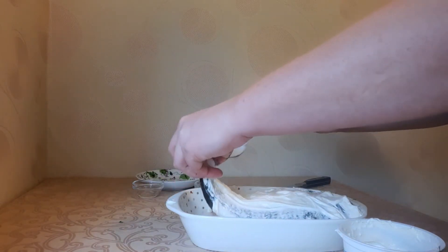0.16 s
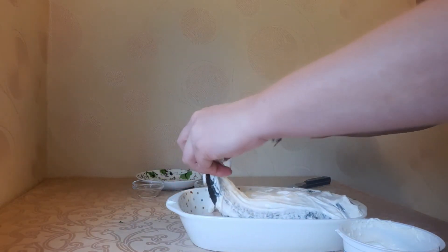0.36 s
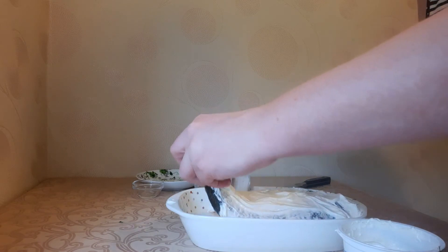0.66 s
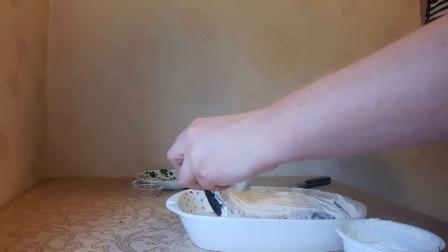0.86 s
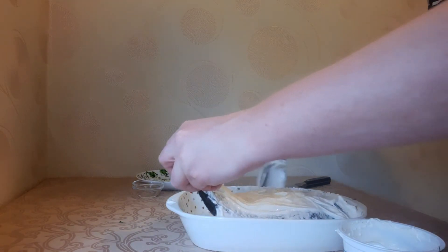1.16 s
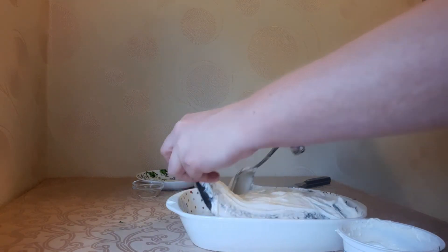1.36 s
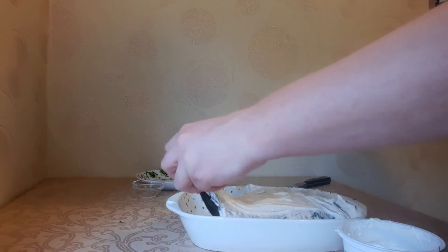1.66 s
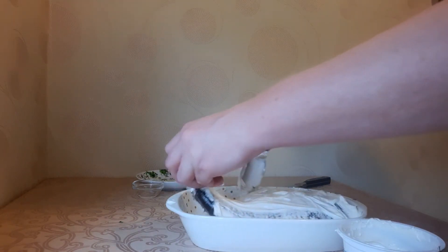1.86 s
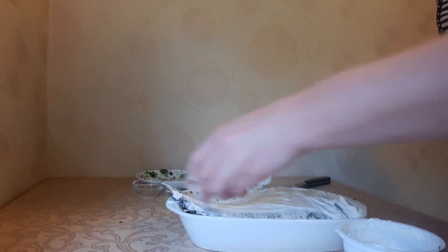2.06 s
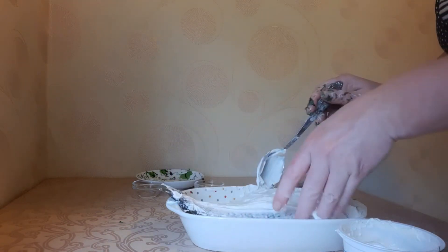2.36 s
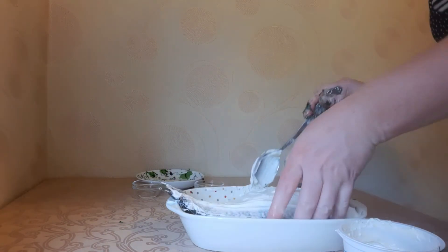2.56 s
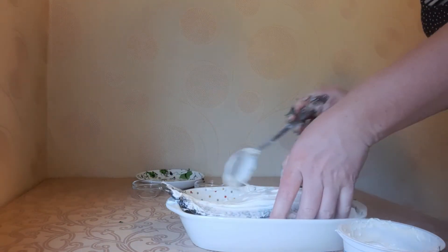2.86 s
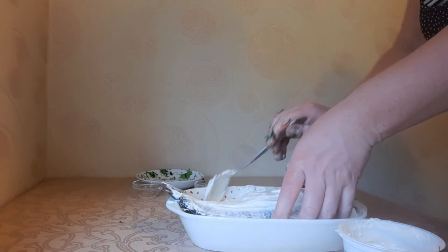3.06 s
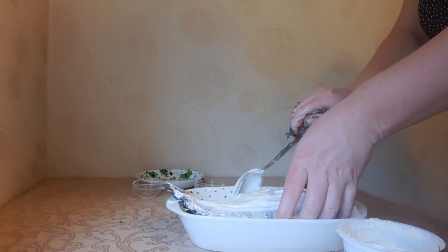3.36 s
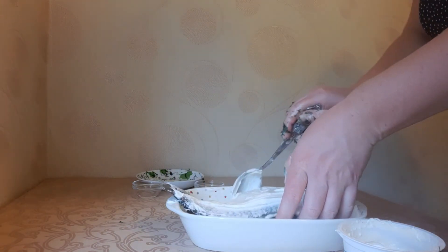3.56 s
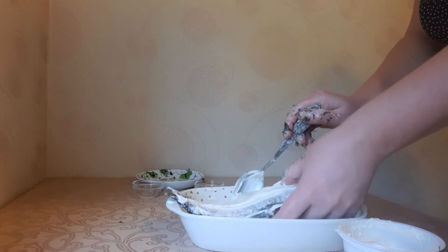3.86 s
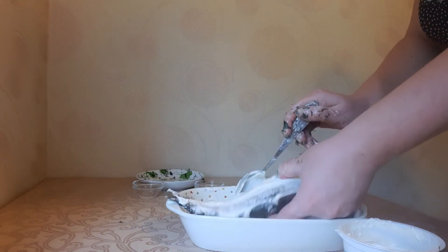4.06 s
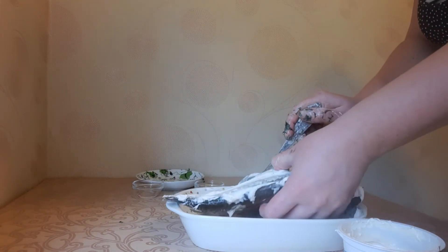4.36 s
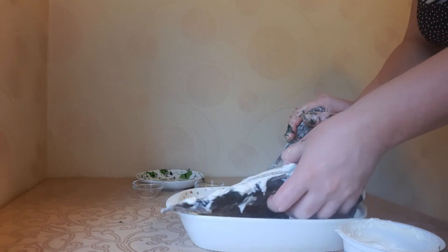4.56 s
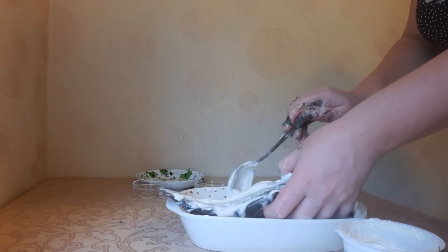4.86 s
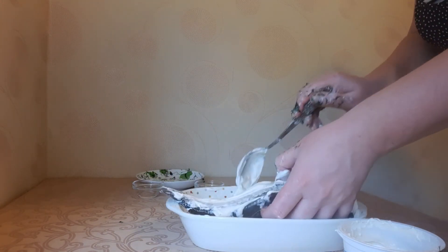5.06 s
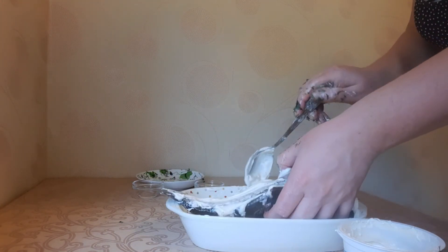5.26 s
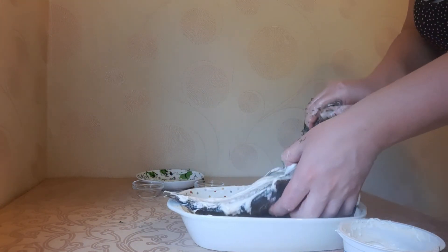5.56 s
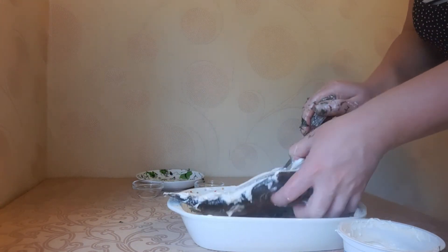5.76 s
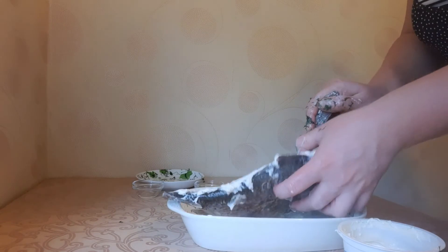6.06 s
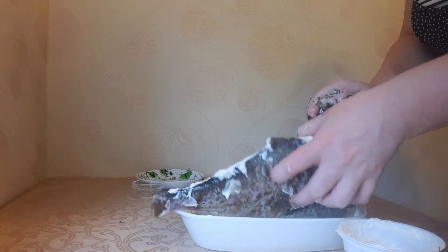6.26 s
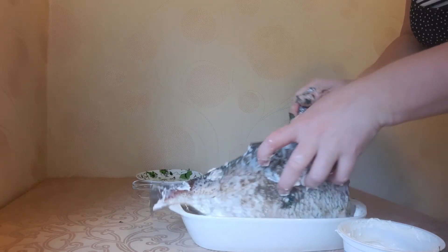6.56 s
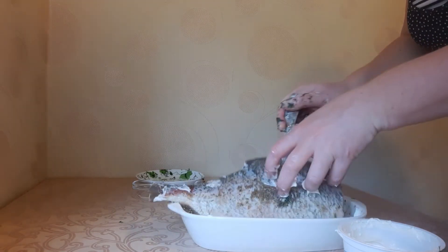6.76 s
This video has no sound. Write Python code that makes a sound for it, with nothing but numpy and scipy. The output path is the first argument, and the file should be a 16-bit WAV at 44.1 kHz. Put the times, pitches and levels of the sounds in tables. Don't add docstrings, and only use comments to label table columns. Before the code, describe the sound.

A spoon knocks in short, damped clacks on a sauce-coated ceramic dish in a small kitchen, then drops loudly and scrapes, over faint refrigerator hum.

```python
import sys
import numpy as np
from scipy import signal
from scipy.fft import rfft, irfft, next_fast_len
from scipy.io import wavfile
from scipy.ndimage import uniform_filter1d, map_coordinates

SR = 44100
rng = np.random.default_rng(int(sys.argv[2]) if len(sys.argv) > 2 else 0)


def to_linear_factor(level_db):
    exponent = np.asarray(level_db, float) / 20
    return 10 ** exponent


def waveform_to_disk(signal):
    frames = np.transpose(np.atleast_2d(signal))
    scaled = np.clip(frames, -1, 1) * 32767
    samples = np.round(scaled).astype(np.int16)
    wavfile.write(sys.argv[1], SR, samples)


N = 304731
SPAN = 20480

# pitch_hz, level_db (rms)
FRIDGE_HUM = [(96.9, -78.5), (145.3, -70), (199.2, -74), (247.6, -74), (296.1, -77), (344.5, -94),
              (398.4, -73.5), (543.7, -78), (640.6, -86), (829.0, -82.5)]
# pitch_hz, width_hz, level_db (rms)
FRIDGE_WHINE = [(2791, 57, -77.5), (2400, 26, -89)]
# freq_hz, level_db (per Hz)
RUMBLE_COLOUR = [(15, -34.5), (25, -16.5), (58, 8), (136, -2), (248, -8.5), (343, -31), (399, -2.5),
                 (500, -11.5), (650, -33), (1100, -120)]
AIR_COLOUR = [(150, -26.5), (250, 0.5), (345, 2.5), (400, -4), (468, -4.5), (875, -2), (1390, -14.5),
              (2000, -20), (2600, -30), (4400, -120)]
HISS_COLOUR = [(710, -42), (1200, -12.5), (1400, -21.5), (2350, -12), (2530, -13.5), (2790, -7),
               (2890, -12), (3110, -17.5), (5180, -23), (8630, -17.5), (10400, -23), (15200, -20),
               (16000, -20)]
# middle_s (of the swell), length_s, swell_db
WEIGHT_SHIFTS = [(0.023, 0.49, 4.5), (2.24, 0.14, 5), (2.597, 0.48, 3.5), (3.19, 0.43, 11),
                 (3.738, 0.2, 17.5), (4.06, 0.62, 9), (4.626, 0.68, 6.5), (5.533, .3, 24),
                 (5.834, 0.77, 3.5), (6.304, 0.63, 16.5), (6.662, 0.19, 3.5)]
# freq_hz, likeness (1 same, 0 unrelated)
STEREO_LIKENESS = [(60, 0.97), (180, 0.87), (550, 0.45), (1650, -0.22), (4970, -0.004), (15000, -0.15)]
# freq_hz, left_minus_right_db
BACKGROUND_LEAN = [(60, 4), (130, 2), (290, 6.5), (640, -0.5), (1410, 0.5), (3100, 4), (6820, 0.5),
                   (15000, 0)]
# freq_hz, left_minus_right_db
MIC_DIFFERENCE = [(100, -2), (400, 3), (2000, 0.5), (4500, 1.5), (10000, -1.5)]
# freq_hz, decay_s (to fall 60 dB)
KITCHEN_DECAY = [(70, 0.15), (250, 0.56), (1000, 0.38), (3000, 0.38), (7000, 0.36), (14000, 0.27)]

# pitch_hz, width_hz, level_db
TABLE_MODES = [(67.4, 27, 2), (136.5, 39, 1.5), (313, 110, -6.5)]
# start_s, peak_db
PUSHES = [
    (1.432, -40),
    (2.021, -46.5),
    (2.186, -40),
    (3.71, -32.5),
    (6.149, -42),
]
# start_s, peak_db, pitch_hz, spread (0 narrow to 1 wide)
SAUCE_SMACKS = [(0.1334, -68, 8600, 0.7), (0.2694, -69, 7640, 0.5), (0.6669, -60, 8700, 0.9),
                (0.8494, -70, 8670, 0.6), (1.7015, -57, 12500, 1), (1.886, -62, 7850, 0.6),
                (2.1904, -63.5, 8350, 0.65), (2.4608, -64, 7600, 0.5), (3.981, -66, 4680, 0.8),
                (4.385, -59.5, 4600, 0.37), (4.968, -63.5, 9460, 0.24), (5.784, -57.5, 5370, 0.44),
                (6.845, -60, 7500, 0.4),
                (4.0092, -62.5, 9160, 0.69),
    (5.7847, -52.5, 9800, 0.48),
    (6.3999, -54.5, 8200, 0.65),
    (6.4436, -56, 9450, 0.74),
]

# start_s, rise_s, hold_s, pressure_db
SLIDES = [
    (4.372, 0.085, 0.12, -62),
]
GLIDES = [
    (4.597, 0.054, 0.18, -71.5),
]
DRAGS = [
    (5.98, 0.12, 0.019, -47.5),
    (6.086, 0.034, 0.058, -25.5),
    (6.2, 0.019, 0.025, -29.5),
]
LIFTS = [
    (6.32, 0.056, 0.016, -45.5),
    (6.385, 0.018, 0.0098, -39),
]
# start_s, peak_db
SNAGS = [(6.098, -33), (6.107, -35), (6.115, -29), (6.127, -21), (6.136, -32), (6.155, -27), (6.175, -29),
         (6.197, -29), (6.225, -26.5), (6.235, -31), (6.249, -36), (6.361, -52)]
# freq_hz, level_db (per Hz)
GLAZE_GRIT = [(120, -57), (200, -10), (728, -22.5), (923, 3), (1030, -10.5), (1650, -2), (2170, -15.5),
              (3120, -19.5), (15500, -63.5)]
# pitch_hz, width_hz, level_db
SPOON_MODES = [(3084, 32, 3.5), (5820, 87, -23), (7790, 28, -17.5), (11300, 220, -25.5)]

# start_s, peak_db, thud_db (of the table)
TAPS = [
    (1.028, -22.5, -33),
    (1.06, -26.5, -18),
]
SIDE_KNOCKS = [
    (1.298, -23, -17.5),
]
RIM_KNOCKS = [
    (3.0574, -11.5, -28.5),
]
LIP_KNOCKS = [
    (3.499, -21, -24),
]
NUDGES = [
    (4.173, -39, -13),
    (5.838, -44.5, -40),
    (5.956, -39.5, -6.5),
]
PATS = [
    (4.942, -46, -19),
]
EDGE_KNOCKS = [
    (5.27, -20, -23.5),
]
CLINKS = [
    (5.386, -20, -26.5),
    (5.435, -37.5, -31.5),
]
DROPS = [
    (5.5335, -22, -13.5),
    (5.5362, -6.5, -15),
]
BASE_KNOCKS = [
    (6.09, -26.5, -35),
]
LIFT_KNOCKS = [
    (6.401, -28.5, -17),
    (6.432, -35.5, -12),
    (6.452, -39.5, -25),
]
LAST_KNOCKS = [
    (6.9003, -18.5, -31),
]

# pitch_hz, width_hz, level_db
TAP_MODES = [(431, 7.2, -3), (921, 70, -6.5), (1435, 105, 1.5), (2016, 20, -1.5), (2277, 6.2, 1),
             (2680, 26, -15), (2830, 30, -12.5), (3680, 46, -14.5), (4300, 90, -21)]
SIDE_MODES = [(956, 90, 2.5), (1410, 65, 10.5), (1630, 82, 7.5), (2290, 34, 7), (2650, 110, 3),
              (3620, 70, -0.5), (4400, 76, -3.5), (5870, 150, -9.5), (7050, 65, -18)]
RIM_MODES = [(579, 5.8, -11), (805, 24, 1.5), (1356, 210, -2), (1502, 73, 2), (1680, 51, 3.5),
             (2010, 32, 3), (2890, 200, -13), (3094, 60.5, -12), (5530, 108, -10)]
LIP_MODES = [(308, 114, -22), (634, 22, 8), (1490, 87, 3), (1960, 27, 19), (2900, 100, -4.5),
             (5200, 80, -44), (3320, 72, -11), (6880, 57, -29)]
NUDGE_MODES = [(918, 160, -2), (1566, 82, 0.5), (2035, 12, -2.5), (2680, 66, -27), (3160, 70, -8.5),
               (3820, 70, -45)]
PAT_MODES = [(993, 180, 2.5), (1290, 70, 1), (2050, 67, -11)]
EDGE_MODES = [(465, 28.6, -0.5), (1020, 47, 13.5), (1548, 173, 6), (2570, 170, -1.5), (3740, 86, 3),
              (4810, 39, -43.5), (5900, 15.95, -0.5)]
CLINK_MODES = [(1022, 99, -12), (1432, 63, -13), (2538, 44, -3.5), (3500, 24, -36.5), (5500, 220, -54.5)]
DROP_MODES = [(300, 69, -5.5), (442, 60, -7.5), (1021, 28, -3), (1794, 19, 2.5), (2490, 20, 4),
              (2900, 47, -12), (3380, 85, -4), (4210, 60, -18), (4900, 27, -10), (5540, 29, -11),
              (6960, 52, -10.5)]
BASE_MODES = [(424, 47, -11.5), (963, 7.1, -0.5), (1118, 9.1, 2.5), (1372, 10, 6), (1627, 31, 6.5),
              (1960, 49, -18), (2040, 6.7, -1.5), (2496, 31, -3), (3120, 34, -15.5), (4170, 120, -21.5),
              (6100, 60, -43), (8040, 90, -36)]
LIFT_MODES = [(324, 160, 4), (1190, 33, 7), (1540, 25, 11), (1595, 15, 9), (1960, 71, -5), (2450, 72, -1),
              (3040, 150, -7.5), (4230, 350, -12.5), (5650, 44, -13)]
LAST_MODES = [(1100, 150, 0.5), (1450, 127, 10.5), (1780, 185, 6), (2580, 80, -7), (3650, 250, -10)]
SLIDE_MODES = [(1170, 120, 4), (1570, 75, 0), (2070, 47, -8), (2360, 37, 3.5), (2980, 220, -10.5)]

# freq_hz, level_db (per Hz)
TAP_CLATTER = [(120, -31), (200, -10), (352, 4), (392, -39), (446, -3), (1170, 0.5), (1380, 10.5),
               (1840, 0.5), (2290, -4.5), (2900, -6.5), (5000, -20), (15500, -35)]
SIDE_CLATTER = [(120, -51), (200, -9), (497, 0), (690, -5.5), (1380, 7), (1810, -6), (2210, 0), (3120, -15),
                (3550, -31), (6830, -16), (15500, -30)]
RIM_CLATTER = [(120, -36), (200, -21), (315, -8), (525, -11), (618, -10.5), (950, -8), (1450, -14.5),
               (1780, -5.5), (3000, -13), (3600, -20), (5590, -25), (6350, -33), (15500, -36)]
LIP_CLATTER = [(120, -8), (200, -14), (310, -6.5), (525, -18.5), (618, -7.5), (798, -8.5), (1300, -10),
               (1840, -2.5), (2330, -9.5), (3500, -13), (4100, -24.5), (7000, -29.5), (15500, -40)]
EDGE_CLATTER = [(120, -11.5), (200, -13.5), (446, 4), (600, -22.5), (1090, -8.5), (1910, -1), (2130, -23.5),
                (2330, 4.5), (3120, -21.5), (4330, -2), (5110, -34.5), (7220, -11.5), (15500, -23.5)]
DROP_CLATTER = [(120, -45.5), (200, -11), (310, -3.5), (525, -17.5), (874, -8.5), (1280, -15.5),
                (2510, -17.5), (2800, -10.5), (3300, -16), (4400, -27.5), (6240, -29.5), (15500, -38)]
BASE_CLATTER = [(120, -45), (200, -22), (407, -6), (728, -23), (923, 3), (1030, -12), (1650, -5),
                (2170, -23), (2470, 0), (2800, -21.5), (3120, -16), (3680, -21), (6710, -36.5),
                (7760, -24.5), (15500, -56.5)]


def unit(x):
    return x / np.sqrt(np.mean(x ** 2) + 1e-20)


def along(points, hz):
    f, value = np.transpose(points)
    return np.interp(np.log(hz + 1), np.log(f + 1), value)


def wobble(rate, size=N):
    coarse = np.arange(0, size + 64, 64)
    knots = rng.standard_normal(int(size * rate / SR) + 4)
    curve = map_coordinates(knots, [coarse * rate / SR])
    return np.interp(np.arange(size), coarse, curve)


def filtered(x, response):
    n = x.shape[-1]
    padded = 2 * next_fast_len(n // 2 + 2048)
    hz = np.fft.rfftfreq(padded, 1 / SR)
    return irfft(rfft(x, padded) * response(hz), padded)[..., :n]


def body(modes, damping):
    def response(f):
        total = 0
        for k, (pitch_hz, width_hz, level_db) in enumerate(modes):
            loss = 1j * f * (width_hz * damping + pitch_hz / 55)
            sign = (-1) ** k
            total = total + sign * to_linear_factor(level_db) * loss / (pitch_hz ** 2 - f ** 2 + loss)
        return total
    return response


def causal(spectrum):
    def response(hz):
        cepstrum = irfft(np.log(to_linear_factor(along(spectrum, hz)) + 1e-4))
        cepstrum[1:len(hz) - 1] *= 2
        cepstrum[len(hz):] = 0
        return np.exp(rfft(cepstrum))
    return response


def diffuse(pair):
    def mid_and_side(hz):
        angle = np.arccos(np.clip(along(STEREO_LIKENESS, hz), -1, 1)) / 2
        return np.array([np.cos(angle), np.sin(angle)])
    mid, side = filtered(pair, mid_and_side)
    return np.array([mid + side, mid - side])


def room(x):
    gap_s, rise_s = 0.00065, 0.0014
    hz, t, z = signal.stft(rng.standard_normal((2, SPAN)), SR, nperseg=256)
    decay = to_linear_factor(-60 * t / along(KITCHEN_DECAY, hz)[:, None])
    tail = diffuse(signal.istft(z * decay, SR, nperseg=256)[1][:, :SPAN])
    since_gap_s = np.clip(np.arange(SPAN) / SR - gap_s, 0, None)
    tail = tail * (1 - np.exp(-since_gap_s / rise_s))
    tail = tail / np.linalg.norm(tail[0])
    return signal.fftconvolve(x[None], tail, axes=1)[:, :len(x)]


def add(out, start_s, sound):
    start = round(start_s * SR)
    part = out[:, start:start + SPAN]
    part += sound[:, :part.shape[1]]


def struck(response, chatter_s):
    knots = rng.random(64) ** 2

    def chattering(f):
        lag_s = chatter_s * np.interp(f, np.arange(len(knots)) * 350, knots)
        return response(f) * np.exp(-2j * np.pi * f[1] * np.cumsum(lag_s))
    ring = filtered(signal.unit_impulse(SPAN // 2), chattering)
    return np.pad(ring / np.max(np.abs(ring)), (0, SPAN // 2))


def softened(response, soft_hz):
    return lambda f: response(f) / (1 + 1j * f / soft_hz) ** 2


def rush(spectrum, patchy_db):
    z = signal.stft(rng.standard_normal((2, N)), nperseg=512)[2]
    patches = uniform_filter1d(rng.standard_normal(z.shape[1:]), 6, 0)
    patches = unit(uniform_filter1d(patches, 14, 1))
    pair = signal.istft(z * to_linear_factor(patchy_db * patches), nperseg=512)[1][:, :N]
    return unit(filtered(diffuse(pair), lambda hz: to_linear_factor(along(spectrum, hz))))


def fridge_hum():
    t = np.arange(N) / SR
    hum = np.zeros(N)
    for pitch_hz, level_db in FRIDGE_HUM:
        level = 2 ** .5 * to_linear_factor(level_db + 0.39 * wobble(2.4))
        phase = 0.55 * wobble(7.2) + 2 * np.pi * rng.random()
        hum += level * np.sin(2 * np.pi * pitch_hz * t + phase)
    return hum


def fridge_whine():
    whine = np.zeros((2, N))
    for pitch_hz, width_hz, level_db in FRIDGE_WHINE:
        def band(f):
            return 1 / (1 + (2 * (f - pitch_hz) / width_hz) ** 2)
        whine += to_linear_factor(level_db) * unit(filtered(rng.standard_normal((2, N)), band))
    return whine


def weight_swell():
    t = np.arange(N) / SR
    swell_db = np.zeros(N)
    for middle_s, length_s, rise_db in WEIGHT_SHIFTS:
        swell_db += rise_db * np.cos(np.pi * np.clip((t - middle_s) / length_s, -.5, .5)) ** 2
    return swell_db


def room_boom(swell_db):
    boom_hz = 65
    level = to_linear_factor(-76 + 0.43 * swell_db + 3 * wobble(5.77))
    return level * np.sin(2 * np.pi * boom_hz * np.arange(N) / SR + 1.26 * wobble(4.9))


def background():
    swell_db = weight_swell()
    rumble = to_linear_factor(-65.5 + swell_db + wobble(2.4)) * rush(RUMBLE_COLOUR, patchy_db=2.5)
    air = to_linear_factor(-68 + 0.55 * swell_db + wobble(1.5)) * rush(AIR_COLOUR, patchy_db=2.0)
    hiss = to_linear_factor(-76) * rush(HISS_COLOUR, patchy_db=0.3)
    mix = fridge_hum() + fridge_whine() + room_boom(swell_db) + rumble + air + hiss
    return filtered(mix, lambda hz: to_linear_factor(along(BACKGROUND_LEAN, hz) * np.array([[.5], [-.5]])))


def thuds():
    out = np.zeros((2, N))
    for start_s, peak_db in PUSHES:
        push = struck(softened(body(TABLE_MODES, 1), soft_hz=298), chatter_s=0.0037)
        add(out, start_s, to_linear_factor(peak_db - 3) * (push + 1.3 * room(push)))
    return out


def smacks():
    out = np.zeros((2, N))
    decay = to_linear_factor(-60 * np.arange(SPAN) / SR / 0.043)
    for start_s, peak_db, pitch_hz, spread in SAUCE_SMACKS:
        def band(f):
            return np.exp(-(np.log((f + 1) / pitch_hz) / max(spread, .05)) ** 2 * 4)
        tick = filtered(rng.standard_normal(SPAN) * decay, band)
        level = to_linear_factor(peak_db - 6) / np.max(np.abs(tick))
        add(out, start_s, level * (tick + to_linear_factor(7.5) * room(tick)))
    return out


def pressure(stroke, t):
    sag_db, release_db_per_s = 4.5, 376
    total = 0
    for start_s, rise_s, hold_s, level_db in stroke:
        held_s = t - start_s - rise_s
        bearing = np.clip((t - start_s) / rise_s, 0, 1) ** 2
        sag = sag_db * np.clip(held_s / hold_s, 0, 1)
        release = release_db_per_s * np.clip(held_s - hold_s, 0, None)
        total = total + bearing * to_linear_factor(level_db - sag - release)
    return total


def spoon_stroke(stroke, modes, grit_db, spoon_db, snags=()):
    start_s, slips_per_s = stroke[0][0], 700
    t = np.arange(SPAN) / SR
    happens = rng.random((4, SPAN)) < slips_per_s / SR
    slips = happens * rng.standard_normal((4, SPAN)) * to_linear_factor(1.2 * rng.exponential(1, (4, SPAN)))
    slips = slips * to_linear_factor(1.55 * np.array([wobble(58.0, size=SPAN) for _ in slips]))
    slips[3] *= to_linear_factor(-36 * np.clip(t - .15, 0, None))

    def paths(f):
        dish_a, dish_b = body(modes[::2], 1.3)(f), body(modes[1::2], 1.3)(f)
        grit = to_linear_factor(grit_db) * causal(GLAZE_GRIT)(f)
        spoon = to_linear_factor(spoon_db) * body(SPOON_MODES, 1.1)(f)
        dulling = (1 + 1j * f / 9000) * (1 + (f / 13500) ** 8)
        return np.array([dish_a, dish_b, grit, spoon]) / dulling

    drag = unit(filtered(slips, paths).sum(axis=0)) * to_linear_factor(-4.5) * pressure(stroke, start_s + t)
    for snag_s, peak_db in snags:
        shares = to_linear_factor(3 * rng.standard_normal((4, 1)))
        snag = struck(lambda f: (shares * paths(f)).sum(axis=0), chatter_s=.0012)
        delay = (snag_s - start_s) * SR
        begun = np.arange(SPAN) >= delay - 40
        drag += to_linear_factor(peak_db) * np.roll(snag, round(delay)) * begun
    out = np.zeros((2, N))
    add(out, start_s, drag * to_linear_factor([[1.2], [-1.2]]) + to_linear_factor(1.0) * room(drag))
    return out


def scrape():
    return (spoon_stroke(SLIDES, SLIDE_MODES, grit_db=3, spoon_db=-30)
            + spoon_stroke(GLIDES, SLIDE_MODES[2:], grit_db=-12, spoon_db=-34)
            + spoon_stroke(DRAGS, BASE_MODES, grit_db=-4, spoon_db=-6, snags=SNAGS)
            + spoon_stroke(LIFTS, LIFT_MODES, grit_db=-5, spoon_db=-20))


def wall_path(f):
    wall_s, wall_db = .0052, -9
    return (1 + to_linear_factor(wall_db) * np.exp(-2j * np.pi * f * wall_s)) / (1 + 1j * f / 5000)


def knocks(rows, modes, clatter, clatter_db, room_db, damping, chatter_s, soft_hz, sent_db=-2):
    out = np.zeros((2, N))
    pan_db = np.array([[0.25], [-0.25]])
    for start_s, peak_db, thud_db in rows:
        ring = struck(softened(body(modes, damping), soft_hz), chatter_s)
        thud = struck(softened(body(TABLE_MODES, 1), 600), chatter_s)
        rest = to_linear_factor(clatter_db) * struck(causal(clatter), chatter_s) + to_linear_factor(thud_db) * thud
        direct = filtered(ring + rest, wall_path)
        echoes = to_linear_factor(room_db) * (to_linear_factor(sent_db) * room(ring) + room(rest))
        add(out, start_s - .0005, to_linear_factor(peak_db - 3.5 + pan_db) * (direct + echoes))
    return out


def crockery():
    return (knocks(TAPS, TAP_MODES, TAP_CLATTER, clatter_db=-4.5, room_db=3.5,
                   damping=0.39, chatter_s=0.00306, sent_db=-6, soft_hz=4970)
            + knocks(SIDE_KNOCKS, SIDE_MODES, SIDE_CLATTER, clatter_db=1.5, room_db=2.0,
                     damping=0.67, chatter_s=0.0044, sent_db=3.0, soft_hz=7000)
            + knocks(RIM_KNOCKS, RIM_MODES, RIM_CLATTER, clatter_db=-0.8, room_db=9,
                     damping=0.8, chatter_s=0.0025, sent_db=-2.5, soft_hz=7000)
            + knocks(LIP_KNOCKS, LIP_MODES, LIP_CLATTER, clatter_db=4.5, room_db=10.5,
                     damping=0.69, chatter_s=0.0042, sent_db=-11, soft_hz=7010)
            + knocks(NUDGES, NUDGE_MODES, BASE_CLATTER, clatter_db=-6.5, room_db=6.0,
                     damping=0.45, chatter_s=0.00249, soft_hz=3020)
            + knocks(PATS, PAT_MODES, BASE_CLATTER, clatter_db=-19.0, room_db=7.5,
                     damping=0.53, chatter_s=0.00275, soft_hz=1480)
            + knocks(EDGE_KNOCKS, EDGE_MODES, EDGE_CLATTER, clatter_db=-7.0, room_db=6.5,
                     damping=1.3, chatter_s=0.00376, sent_db=-2.0, soft_hz=7000)
            + knocks(CLINKS, CLINK_MODES, BASE_CLATTER, clatter_db=-11.5, room_db=2.0,
                     damping=0.35, chatter_s=0.0037, sent_db=-4, soft_hz=3000)
            + knocks(DROPS, DROP_MODES, DROP_CLATTER, clatter_db=2.5, room_db=-1.5,
                     damping=1.33, chatter_s=0.00281, sent_db=0.5, soft_hz=7100)
            + knocks(BASE_KNOCKS, BASE_MODES, BASE_CLATTER, clatter_db=0.5, room_db=6.0,
                     damping=1.05, chatter_s=0.0053, soft_hz=4000)
            + knocks(LIFT_KNOCKS, LIFT_MODES, BASE_CLATTER, clatter_db=-12, room_db=-7.5,
                     damping=0.53, chatter_s=0.0025, soft_hz=3450)
            + knocks(LAST_KNOCKS, LAST_MODES, SIDE_CLATTER, clatter_db=-8.0, room_db=9.0,
                     damping=1.7, chatter_s=0.00256, soft_hz=3000))


def scene():
    return background() + thuds() + smacks() + scrape() + crockery()


def top_cut(x):
    return signal.sosfilt(signal.butter(12, 16460, fs=SR, output="sos"), x)


def record(dry):
    def microphones(hz):
        bass_cut = (1j * hz / (55 + 1j * hz)) ** 2
        band_limit = hz < 15790
        return bass_cut * band_limit * to_linear_factor(along(MIC_DIFFERENCE, hz) * np.array([[.5], [-.5]]))
    mix = filtered(dry, microphones)
    return top_cut(mix)


dry = scene()
out = record(dry)
waveform_to_disk(out)
```